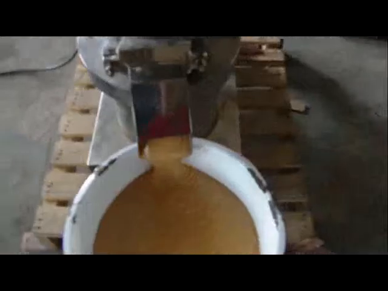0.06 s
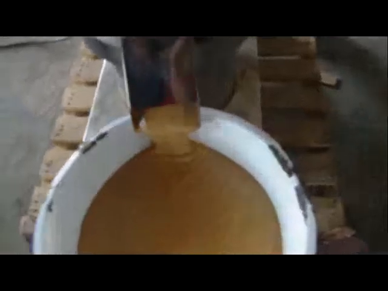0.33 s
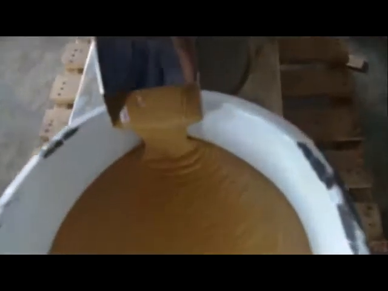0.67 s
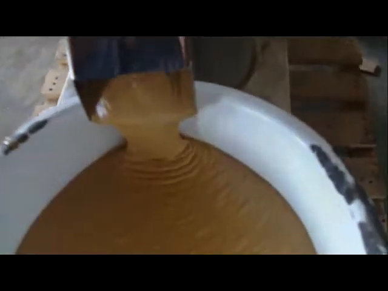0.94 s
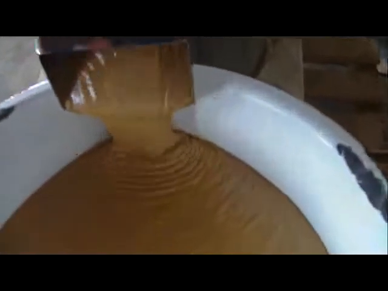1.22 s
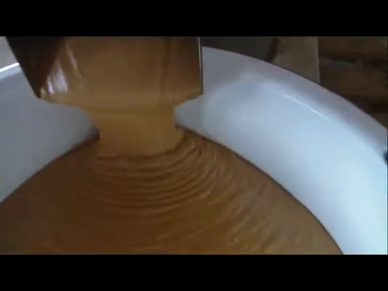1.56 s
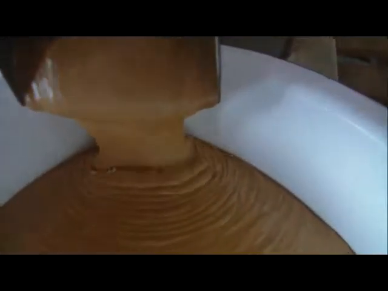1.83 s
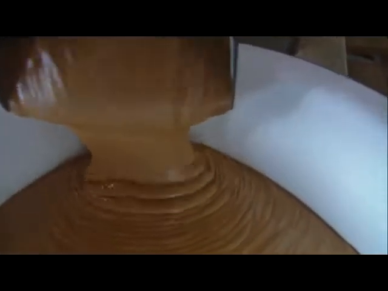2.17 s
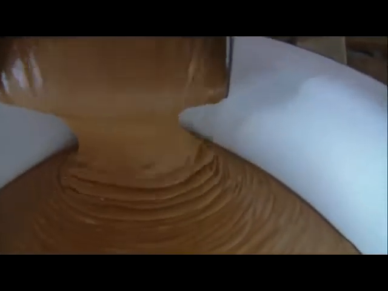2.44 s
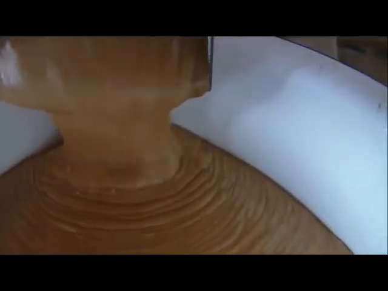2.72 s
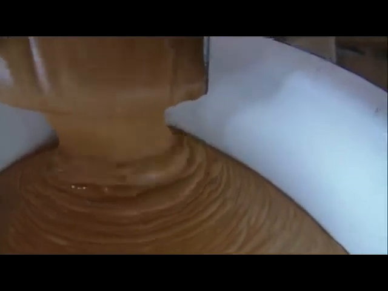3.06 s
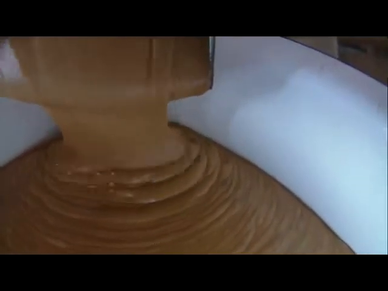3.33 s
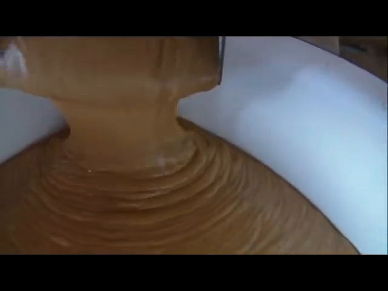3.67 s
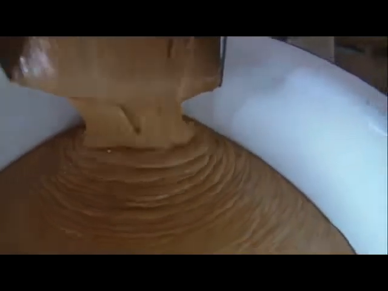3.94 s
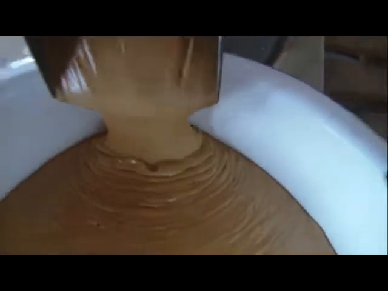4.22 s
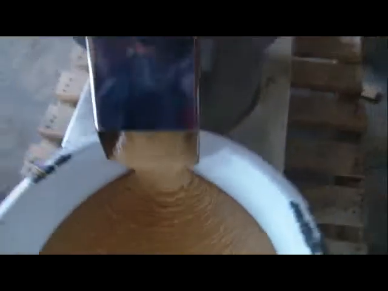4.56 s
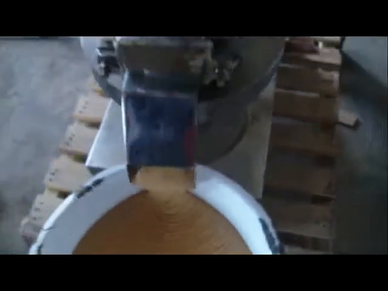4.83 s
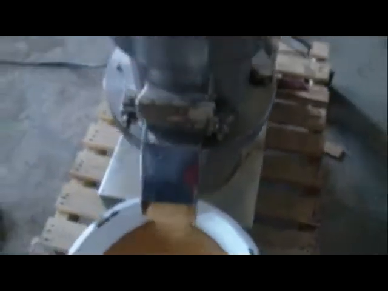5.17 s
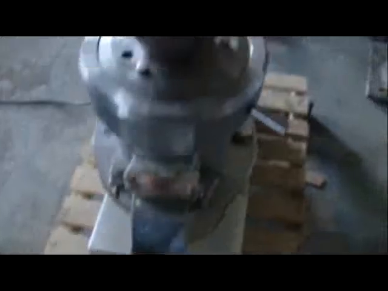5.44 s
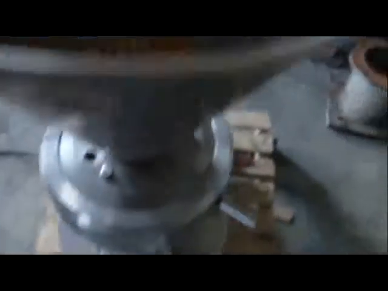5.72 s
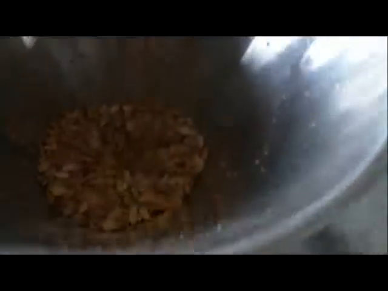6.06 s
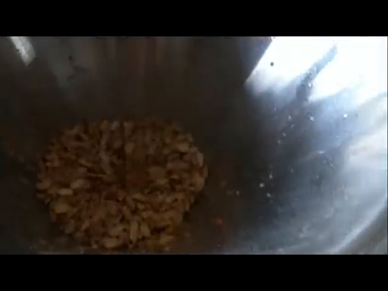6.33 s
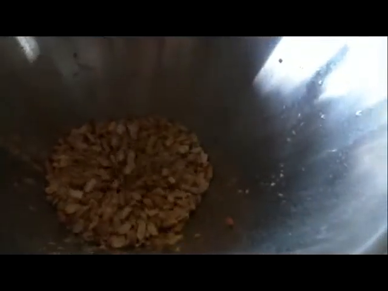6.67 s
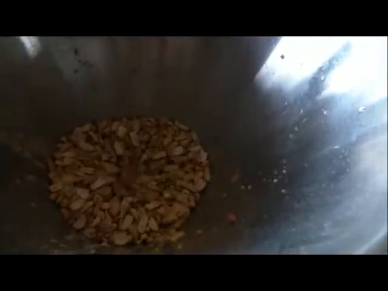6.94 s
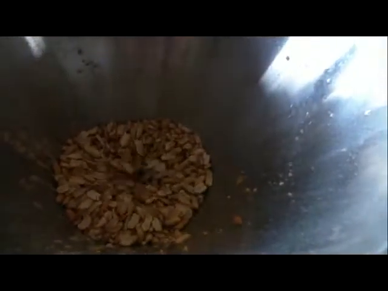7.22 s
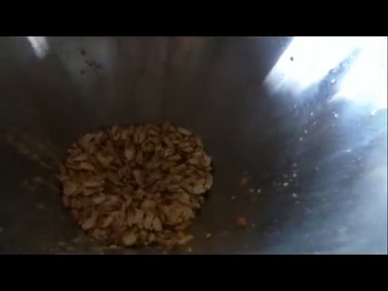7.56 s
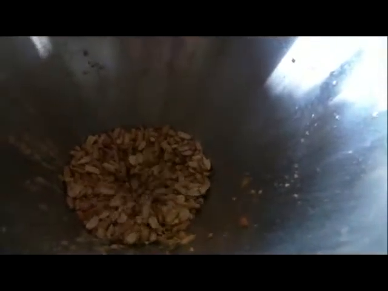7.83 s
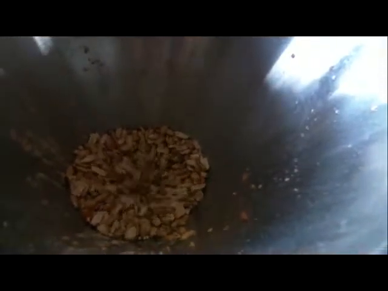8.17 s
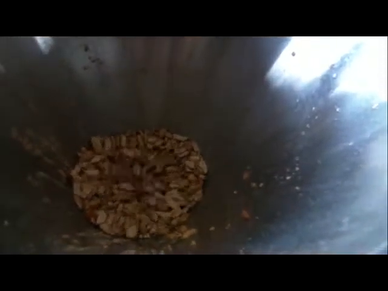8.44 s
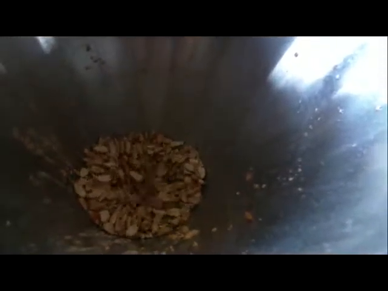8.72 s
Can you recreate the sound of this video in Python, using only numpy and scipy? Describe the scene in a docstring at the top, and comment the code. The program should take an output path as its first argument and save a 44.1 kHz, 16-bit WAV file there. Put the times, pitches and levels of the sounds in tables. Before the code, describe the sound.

An electric grinder whines and rasps while churning nut paste, before the crackle of kernels in its steel funnel takes over.

```python
"""A motor-driven mill whines as it grinds nuts to paste in a workshop, slowing a little under load.
Its grinding discs rasp, chatter and ring the steel housing, while the paste throbs and hard bits snap.
The microphone starts in front, dips to the spout, then rises over the hopper (the feed funnel),
where kernels rattle with each turn and the funnel roars. The rotor hums faintly underneath."""
import sys
import numpy as np
from scipy import signal
from scipy.fft import rfft, irfft
from scipy.io import wavfile

SR = 44100
rng = np.random.default_rng(int(sys.argv[2]) if len(sys.argv) > 2 else 0)


def dump(signal):
    """Clip the signal to [-1, 1] and save it as 16-bit WAV at the path in sys.argv[1]."""
    limited = np.clip(np.atleast_2d(signal).T, -1, 1)
    pcm = np.round(limited * 32767).astype(np.int16)
    wavfile.write(sys.argv[1], SR, pcm)


N = 392049
TIME = np.arange(N) / SR
FREQ = np.maximum(np.arange(N // 2 + 1) * SR / N, 1)

# The whine at the moving microphone. Each row: time in seconds, level in dB.
WHINE_LEVEL = [(0, -30), (.38, -18.7), (2.3, -19.5), (2.65, -16), (2.95, -21.5), (3.35, -20.5), (3.6, -24),
               (4.2, -24), (4.35, -19.5), (4.68, -19.5), (4.9, -33), (5.1, -20.5), (5.7, -17), (6.1, -20.5),
               (6.3, -25), (7.5, -24.5), (8.1, -26), (8.89, -24)]
# The side tones next to the whine. Each row: time in seconds, upper tone in dB, lower tone in dB.
SIDE_TONES = [(0, -16.5, -34), (.55, -29.5, -45), (1.6, -30.5, -48), (2.6, -36, -43), (4.4, -29.5, -38),
              (4.85, -24, -29.5), (5.45, -35, -31), (6.3, -42, -37), (8.89, -30.5, -48)]
# Weak tones further down. Each row: steps from the whine, level in dB before any lift.
FAR_TONES = [(-2, -36.5), (-3, -45)]

def motor(whine_hz, shadow_db, mains_hz=50):
    """The rotor's slots whine; the magnets' pull adds side tones in steps of twice the mains frequency."""
    slots = angle(whine_hz)
    shaft = slots / 28  # 28 slots pass in one turn
    pull = 2 * np.pi * 2 * mains_hz * TIME
    shake = 1 + .16 * np.cos(shaft + .5 * wander(6)) + .2 * wander(110)
    judder = .22 * wander(90)
    upper_db, lower_db = curves(SIDE_TONES)
    lift_db = .98 * np.maximum(lower_db + 31, 0)  # far tones swell once the lower one passes -31 dB
    tones = [(0, curves(WHINE_LEVEL)[0]), (1, upper_db), (-1, lower_db)]
    tones += [(round(step), db + lift_db) for step, db in FAR_TONES]
    waver_db = 1.25 * undb(.27 * shadow_db)  # the whine holds steadier above the hopper's rim
    out = 0
    for step, db in tones:
        lag = step % 2 * np.pi / 2  # odd steps lag, so the pull bends pitch more than level
        phase = slots + step * pull - lag + judder + .13 * waver_db * wander(25)
        out += np.sqrt(2) * undb(db + waver_db * wander(18)) * np.cos(phase)
    return shake * out

# How strongly the discs rasp and their grooves sing. Each row: time in seconds, level in dB.
RASP_LEVEL = [(0, -22), (.7, -21.5), (1.5, -24), (2.3, -25.5), (2.6, -22), (3.1, -24.5), (4.2, -24.5),
              (5.0, -22.5), (5.7, -21), (8.89, -26)]
GROOVE_LEVEL = [(0, -29.5), (.7, -28.5), (1.7, -32.5), (2.6, -30), (3.1, -32), (3.5, -26.5), (4.15, -31),
                (4.8, -32), (8.89, -22)]
# The rasp from bass to treble. Each row: frequency in Hz, boost in dB.
RASP_COLOUR = [(25, -24), (85, -29), (150, -10.5), (220, -7.5), (290, 0), (520, -4), (790, -1), (1050, 2.5),
               (1260, 3.5), (1400, 9.5), (1650, -2.5), (3200, -5.5), (5200, -9), (6600, -16.5),
               (10500, -22.5), (15500, -35)]
# Brief dry scrapes. Each row: middle in seconds, length in seconds, lift of the grooves in dB.
SCRAPES = [(.05, .14, 2.5), (.46, .14, 1.5), (3.3, 0.11, 5.5), (4.77, 0.17, 5), (5.47, 0.12, 5)]
# Tones of grooves and chatter. Each row: pitch at full speed in Hz, width in Hz, relative level in dB.
GROOVE_TONES = [(1048, 45, 7.5), (1856, 30, 4.5), (2098, 36, 3.5), (2400, 45, 0.5), (2630, 60, 1.5),
                (2860, 60, 5), (3083, 38, 3.5), (3355, 42, 2), (3640, 51, -3.5), (3895, 30, -1),
                (4200, 40, -12)]
CHATTER_TONES = [(2662, 48, -1.8), (2915, 30, .5), (3130, 32, 0.05)]
# Spells of hard rubbing. Each row: start in seconds, length in seconds, level in dB.
HARD_RUBS = [(.02, 0.06, -31), (1.5, 0.52, -38), (2.03, 0.22, -28), (2.3, .11, -24.5), (2.5, 0.61, -27),
             (3.14, .1, -22)]

def discs(speed, shadow_db, flutter_hz=21.5):
    """The grooved discs rasp, sing with the speed, chatter when they rub hard and ring the steel."""
    scrape_db = swells(SCRAPES)
    rasp_db = curves(RASP_LEVEL)[0] + .7 * scrape_db
    groove_db = curves(GROOVE_LEVEL)[0] + scrape_db
    bite = undb(.6 * wander(14) + .6 * wander(70))
    rasp = colour(crush(9000, 2.2), RASP_COLOUR) * undb(rasp_db + .5 * shadow_db)
    grooves = rough_tones(GROOVE_TONES, speed) * undb(groove_db)
    rub = spells(HARD_RUBS, rise_s=.051)
    flutter = undb(2.2 * np.cos(2 * np.pi * flutter_hz * TIME + .5 * wander(4)))
    chatter = rough_tones(CHATTER_TONES, speed) * flutter * np.hypot(rub, undb(-40.5))  # never silent
    steel = housing(rub, shadow_db) + spout()
    return bite * (rasp + undb(shadow_db) * (grooves + chatter + steel))

# The housing's two close notes. Each row: pitch in Hz, width in Hz, relative level in dB.
HOUSING_NOTES = [(4617, 48, 0), (4746, 68, 0)]
# Which note leads. Each row: time in seconds, upper note over lower in dB.
HOUSING_BALANCE = [(0, 0), (0.9, -3), (1.7, 8), (2.1, 11), (3.3, 11), (4.2, 7), (4.5, -6), (5.0, 3),
                   (8.89, -3)]

def housing(rub, shadow_db):
    """The steel housing rings all the time, and louder when the discs rub hard."""
    balance = undb(curves(HOUSING_BALANCE)[0])
    lower, upper = (ring(crush(2500, 2.4), [note]) for note in HOUSING_NOTES)
    blend = (lower + balance * upper) / np.hypot(1, balance)
    drive = np.hypot(undb(-34.5 + 1.3 * wander(7.6)), .51 * rub)
    return blend * drive * undb(.27 * shadow_db)

# The spout's ring. Each row: time in seconds, level in dB.
SPOUT_LEVEL = [(0, -32), (1.2, -34), (1.9, -34.5), (2.35, -44), (3.2, -37.5), (4.6, -32), (4.85, -36),
               (5.2, -52), (8.89, -49)]
# Notes of its ring and whistle. Each row: pitch in Hz, width in Hz, relative level in dB.
SPOUT_NOTES = [(5474, 67, -2), (5570, 42, 0.63), (5020, 260, -0.31)]
WHISTLE_NOTES = [(9000, 260, 0), (11000, 200, -4)]
# When the whistle is heard. Each row: start in seconds, length in seconds, level in dB.
WHISTLES = [(2.75, 2.7, -52)]

def spout():
    """The steel spout rings, with a thin whistle that is heard only close by."""
    spout_db, = curves(SPOUT_LEVEL)
    ringing = ring(crush(2500, 2.3), SPOUT_NOTES) * undb(spout_db + 1.2 * wander(9))
    whistle = ring(crush(2500, 2.3), WHISTLE_NOTES) * spells(WHISTLES, rise_s=.4)
    return ringing + whistle * undb(1.3 * wander(12))

# The kernels at the microphone. Each row: time in seconds, level in dB.
KERNEL_LEVEL = [(0, -54), (4.4, -58), (5.0, -34), (5.8, -28), (6.02, -22.5), (6.35, -22), (7.4, -21),
                (8.89, -20.5)]
# Their cracks from bass to treble. Each row: frequency in Hz, boost in dB.
KERNEL_COLOUR = [(170, -27), (300, 7.5), (450, 9.5), (780, 10), (1000, 2), (1700, -1.5), (2650, 1.5),
                 (2950, -6), (3400, 3.5), (5150, 0), (5650, -5), (7300, -2.5), (10800, -16), (15500, -29.5)]
# The funnel's ringing notes. Each row: pitch in Hz, width in Hz, relative level in dB.
FUNNEL_NOTES = [(3686, 60, 1.5), (3610, 410, -2.5), (2700, 90, -10.5), (560, 27, -4.5), (4940, 180, -9),
                (7260, 400, -11)]

def kernels(speed):
    """Kernels crack twice a turn, once harder, in uneven mouthfuls; the funnel rings with them."""
    kernel_db, = curves(KERNEL_LEVEL)
    turn = angle(54.9 * speed) + .9 * wander(11)
    mouthful = undb(.7 * wander(16) + .4 * wander(45))
    strike = undb(.9 * np.cos(turn) + np.cos(2 * turn))
    cracks = colour(crush(4500, 2.6) * strike, KERNEL_COLOUR)
    pings = undb(-24) * chips(count=2400, low_hz=6100, high_hz=11270, decay_s=.0016, spread_db=15)
    beam_db = .97 * np.minimum(kernel_db + 21, 0)  # the funnel aims its ring up, away from the sides
    funnel = ring(crush(4000, 2.6), FUNNEL_NOTES) * undb(2 * np.cos(turn) - 1.5 + beam_db)
    return undb(kernel_db) * mouthful * (cracks + pings + funnel)

def chips(count, low_hz, high_hz, decay_s, spread_db):
    """Chips of nut hit the steel at random, each with its own short, high ring."""
    age = np.arange(512) / SR
    out = np.zeros(N + len(age))
    for when, pitch, size in rng.random((count, 3)):
        start, hz = int(when * N), low_hz + pitch * (high_hz - low_hz)
        ping = age * np.exp(-age / decay_s) * np.sin(2 * np.pi * hz * age)
        out[start:start + len(age)] += undb(spread_db * size ** 2) * ping
    return level(out[:N])

# Lumps of paste throb in the chamber. Each row: middle in seconds, level in dB.
THROBS = [(.08, -22), (.47, -32), (.69, -23), (.85, -18), (1.06, -16), (1.17, -17.5), (1.29, -20),
          (1.41, -17.5), (1.62, -19.5), (1.97, -17.5), (2.1, -20.5), (2.25, -13.5), (2.39, -26),
          (2.78, -19), (3.32, -20), (3.69, -23), (4.64, -20), (6.36, -14), (8.24, -8)]
# The hollow of funnel and spout booms; the funnel's throat joins in as the heap sinks.
# Each row: time in seconds, level in dB.
HOLLOW_LEVEL = [(0, -37), (1.0, -31), (3.1, -29.5), (3.95, -21.5), (4.4, -26.5), (4.95, -25), (5.5, -24.5),
                (6.4, -20.5), (8.89, -26)]
THROAT_LEVEL = [(0, -67), (5.6, -51), (6.5, -25), (7.1, -28), (8.89, -23.5)]
# The notes of these three spaces. Each row: pitch in Hz, width in Hz, relative level in dB.
CHAMBER_NOTES = [(613.7, 24, -1.5), (663, 38, -2.5)]
HOLLOW_NOTES = [(317, 49, -9.5), (392, 150, 2), (457, 78, 5.5), (580, 43, -0.5)]
THROAT_NOTES = [(534, 20, 0)]

def paste(shadow_db, throb_s=.065):
    """Paste churning between the discs throbs in the chamber and booms in the funnel."""
    hollow_db, = curves(HOLLOW_LEVEL)
    throat_db, = curves(THROAT_LEVEL)
    throbs = swells([(middle, throb_s, undb(db)) for middle, db in THROBS])
    churn = np.hypot(undb(-25 + 1.5 * wander(16)), throbs)
    chamber = ring(crush(3000, 2.2), CHAMBER_NOTES) * churn * undb(.55 * shadow_db)
    hollow = ring(crush(3000, 1.9), HOLLOW_NOTES) * undb(hollow_db + .49 * wander(14) + .14 * shadow_db)
    throat = ring(crush(3000, 1.7), THROAT_NOTES) * undb(throat_db + 1.2 * wander(30))
    bass_cut = signal.butter(4, 235, "high", fs=SR, output="sos")  # a small body gives off little bass
    return signal.sosfilt(bass_cut, chamber + hollow + throat)

# Sharp ticks. Each row: start in seconds, level in dB, pitch in Hz, fade time in seconds.
TICKS = [(2.244, -17.5, 5000, 0.0079), (2.246, -27.5, 8400, .006), (2.49, -39, 8900, .01),
         (2.747, -30, 9200, 0.0083), (3.03, -19, 2900, .007), (3.032, -23, 3700, .015),
         (3.425, -35, 9000, .015), (4.159, -18, 4160, 0.0044), (4.159, -20, 800, .009),
         (4.175, -36, 9220, .015), (5.07, -37, 9000, .012), (7.299, -19, 5100, .007),
         (7.895, -21, 2600, .006), (8.515, -21, 2520, .006)]

def ticks():
    """Hard bits snap in the mill: a short gritty burst with one strong ring."""
    out = np.zeros(N)
    grit = rng.standard_normal(N)
    spray = colour(grit, [(300, -15), (1000, -19), (2500, 17), (5000, -19), (10000, -1), (15000, -22)])
    for start, db, hz, decay_s in TICKS:
        age = np.maximum(TIME - start, 0)
        # the shorter the snap, the wider its ring and the more it sprays
        snap = ring(grit, [(hz, 3.5 / decay_s, 0)]) + np.sqrt(.0007 / decay_s) * spray
        out += undb(db) * (1 - np.exp(-age / .00019)) * np.exp(-age / decay_s) * snap
    return out

# The rotor's hum. Each row: multiple of its lowest pitch, level in dB.
HUM_TONES = [(1, -66), (2, -64), (3, -56.5), (5, -41)]

def rotor(speed, shadow_db):
    """The rotor hums faintly with a few low tones, multiples of a pitch near 56 Hz."""
    turn = angle(55.8 * speed ** .35)
    hum = sum(undb(db + 2 * wander(10)) * np.cos(round(multiple) * turn + .37 * wander(9.2))
              for multiple, db in HUM_TONES)
    return np.sqrt(2) * undb(.2 * shadow_db) * hum

def undb(db):
    """Turn decibels into a factor to multiply by."""
    return 10 ** (np.asarray(db) / 20)

def level(x):
    """Scale a signal to a standard strength (a spread of one)."""
    return x / np.std(x)

def curves(table):
    """Join the values in each column by straight lines in time."""
    times, *columns = np.transpose(table)
    return [np.interp(TIME, times, column) for column in columns]

def swells(rows):
    """A smooth rise and fall for each row."""
    return sum(height * np.cos(np.pi * np.clip((TIME - middle) / length, -.5, .5)) ** 2
               for middle, length, height in rows)

def spells(rows, rise_s):
    """Fade in, hold and fade out for each row."""
    return sum(undb(db) * np.clip(np.minimum(TIME - start, start + length - TIME) / rise_s + .5, 0, 1)
               for start, length, db in rows)

def angle(hz):
    """The angle turned so far at a changing frequency."""
    return 2 * np.pi * np.cumsum(hz) / SR

def wander(per_s):
    """A random drift that changes course per_s times a second."""
    points = rng.standard_normal(8192)
    return level(np.interp(TIME * per_s, np.arange(len(points)), points))

def colour(x, points):
    """Turn parts of a sound up or down, from bass to treble."""
    hz, db = np.transpose(points)
    gain = undb(np.interp(np.log(FREQ), np.log(hz), db))
    return level(irfft(rfft(x) * gain, N))

def ring(x, notes):
    """Make a sound ring at the given notes; a wider note sounds more like noise."""
    power = sum(undb(db) ** 2 / width / (1 + 2 * ((FREQ - hz ** 2 / FREQ) / (2 * width)) ** 2) ** 2
                for hz, width, db in notes)
    return level(irfft(rfft(x) * np.sqrt(power), N))

def crush(per_s, spread_db):
    """Many tiny fractures: random clicks, a few much larger than the rest, over a smooth rub."""
    hit = rng.random(N) < per_s / SR
    size = undb(spread_db * np.minimum(rng.exponential(size=N), 4))
    clicks = level(hit * size * rng.uniform(-1, 1, N))
    return level(clicks + rng.standard_normal(N))

def rough_tones(rows, speed):
    """Tones that follow the shaft speed, each roughened by a quick random waver."""
    turn = angle(speed)
    out = 0
    for hz, width, db in rows:
        out += undb(db) * (wander(1.5 * width) * np.cos(hz * turn)
                           + wander(1.5 * width) * np.sin(hz * turn))
    return level(out)

# The motor slows as the mill fills. Each row: time in seconds, pitch of the whine in Hz.
WHINE_PITCH = [(0, 1352), (.6, 1365), (1.7, 1356), (3.2, 1353), (3.38, 1325), (4.7, 1320), (5.1, 1313),
               (6.1, 1311), (7.8, 1297), (8.89, 1296)]
# Heavy mouthfuls brake it. Each row: middle in seconds, length in seconds, drop in pitch in Hz.
SAGS = [(.93, .4, 23), (1.5, 0.34, 14.5), (2.63, 0.312, 17.53), (4.1, .6, 16)]
# How much direct sound gets past the hopper's rim. Each row: time in seconds, level change in dB.
RIM_SHADOW = [(0, 1.5), (4.7, 1.5), (5.2, -0.5), (5.7, -3.5), (6.2, -14.5), (8.89, -19.5)]
# The level dips briefly. Each row: middle in seconds, length in seconds, drop in dB.
LULLS = [(.9, 0.094, 3), (1.46, 0.11, 3.5), (1.72, 0.043, 3.5), (2.28, .05, 2), (3.56, 0.062, 4),
         (4.19, .07, 3), (4.36, 0.067, 4), (6.18, 0.12, 2), (7.97, 0.14, 3.5), (8.3, 0.15, 3)]

def scene():
    """One shaft speed drives the mill; the hopper's rim shields the parts below it."""
    whine_hz = curves(WHINE_PITCH)[0] - swells(SAGS)
    speed = whine_hz / 1357  # 1 means full speed
    shadow_db, = curves(RIM_SHADOW)
    below_rim = motor(whine_hz, shadow_db) + rotor(speed, shadow_db)
    below_rim += paste(shadow_db) + discs(speed, shadow_db)
    mill = (below_rim + kernels(speed)) * undb(-swells(LULLS))
    return (mill + ticks())[None]

def record(dry):
    """The microphone loses a narrow band at 7900 Hz and cuts off steeply above 15700 Hz."""
    notched = signal.lfilter(*signal.iirnotch(7900, 45, fs=SR), dry)
    return signal.sosfilt(signal.ellip(10, .2, 80, 15700, fs=SR, output="sos"), notched)

dry = scene()
out = record(dry)
dump(out)
```